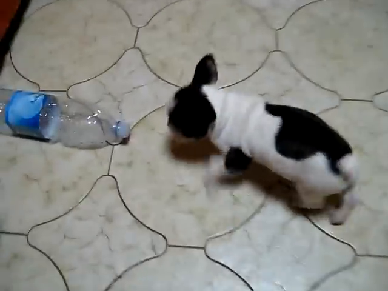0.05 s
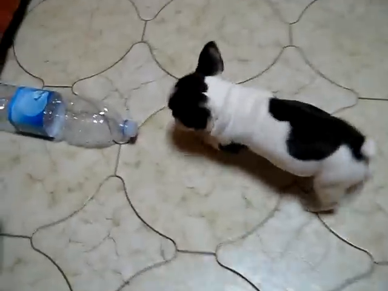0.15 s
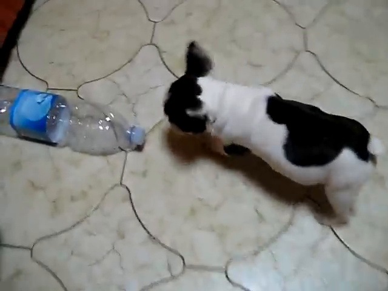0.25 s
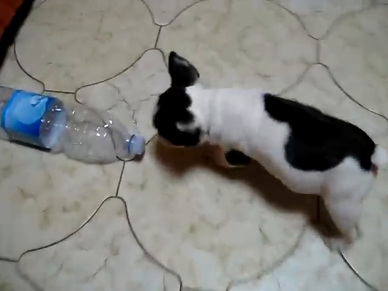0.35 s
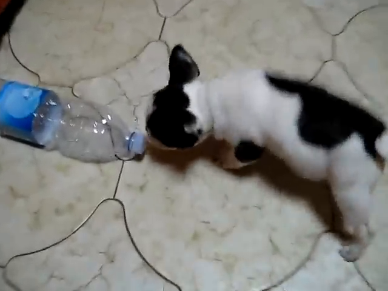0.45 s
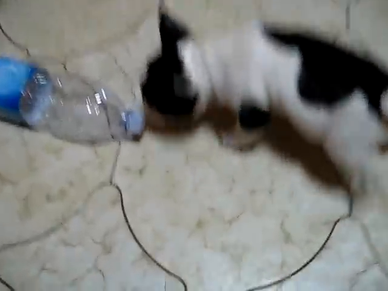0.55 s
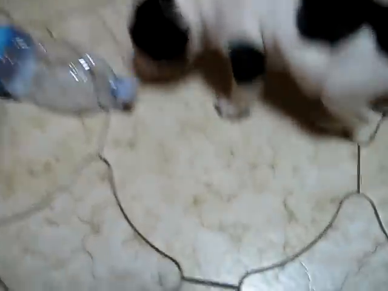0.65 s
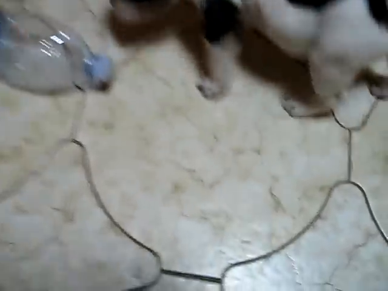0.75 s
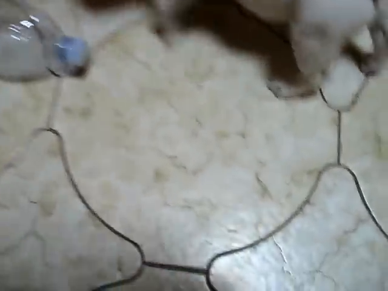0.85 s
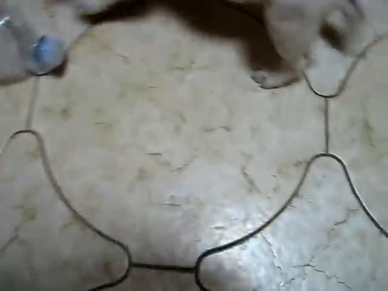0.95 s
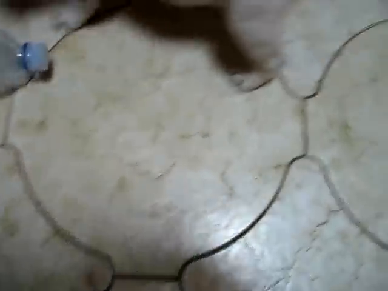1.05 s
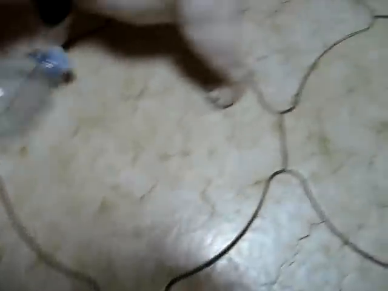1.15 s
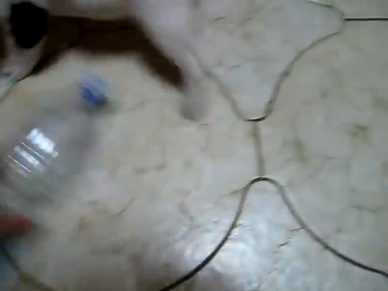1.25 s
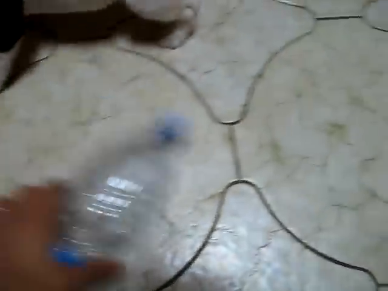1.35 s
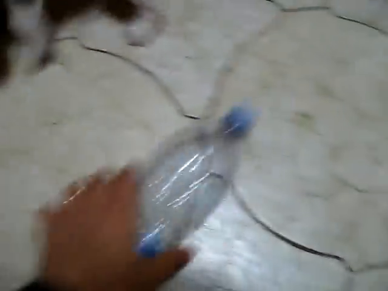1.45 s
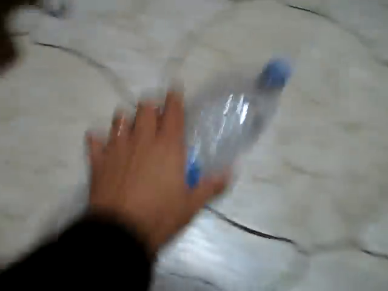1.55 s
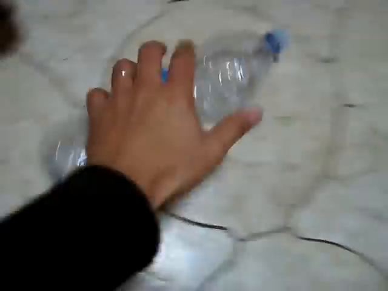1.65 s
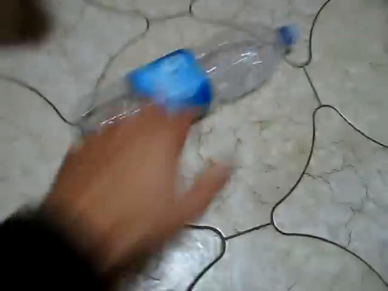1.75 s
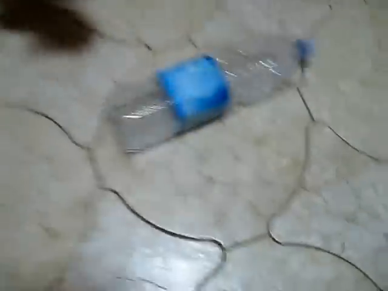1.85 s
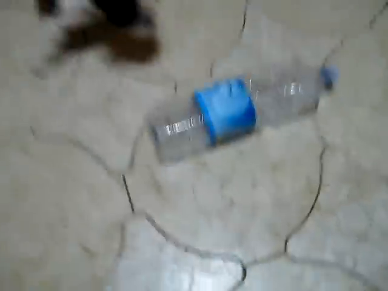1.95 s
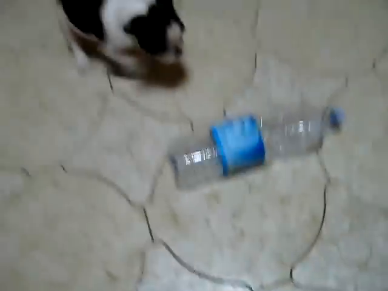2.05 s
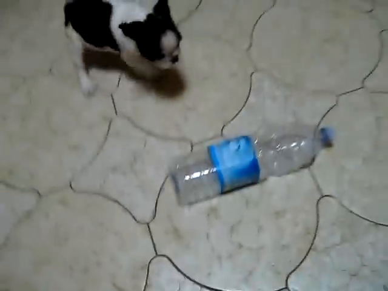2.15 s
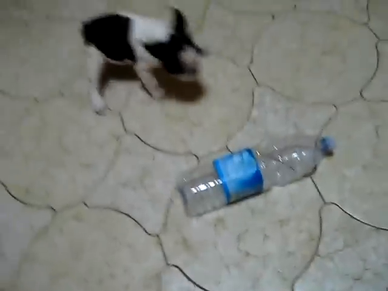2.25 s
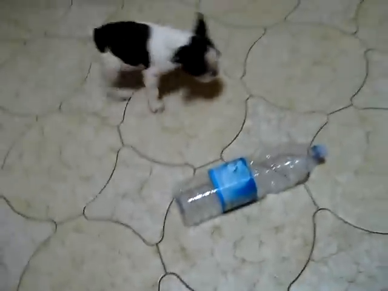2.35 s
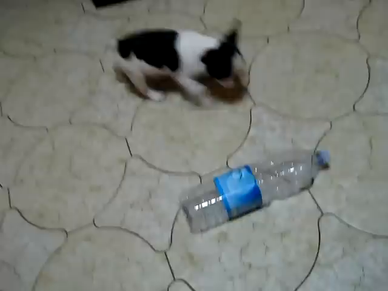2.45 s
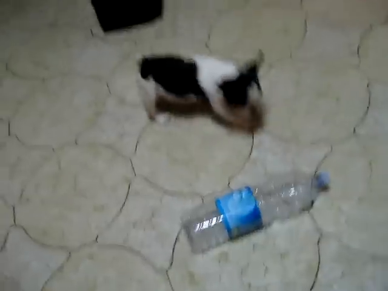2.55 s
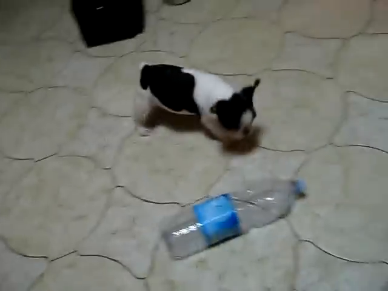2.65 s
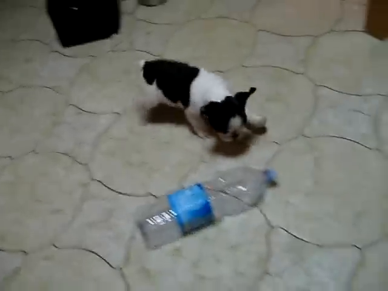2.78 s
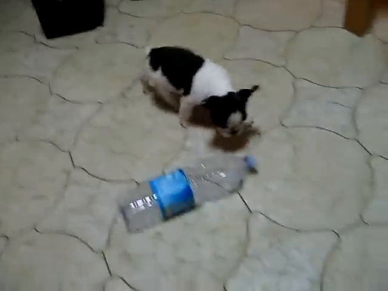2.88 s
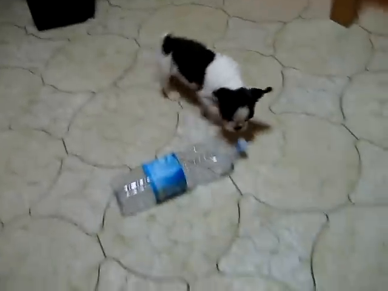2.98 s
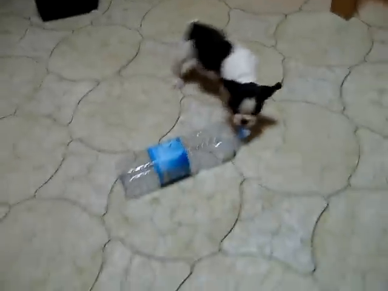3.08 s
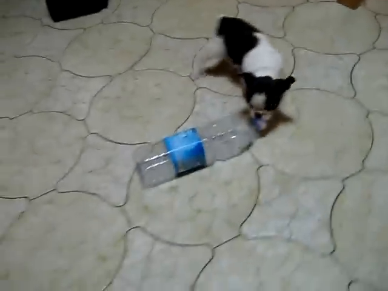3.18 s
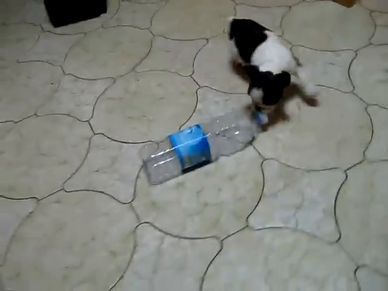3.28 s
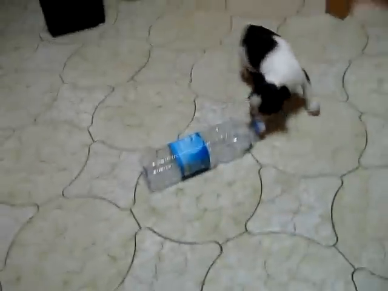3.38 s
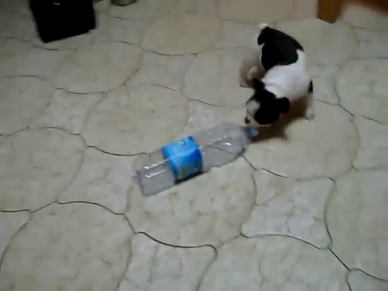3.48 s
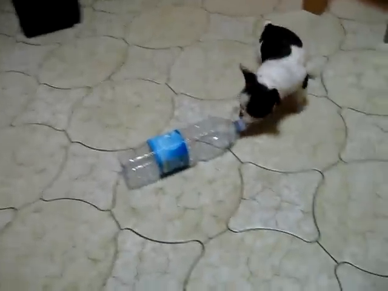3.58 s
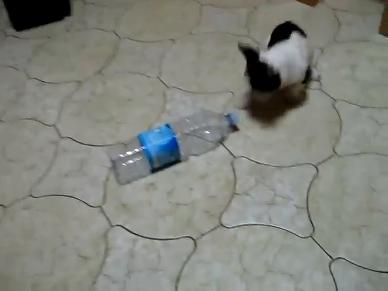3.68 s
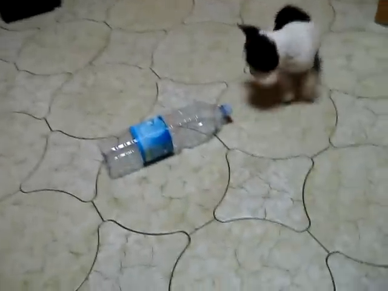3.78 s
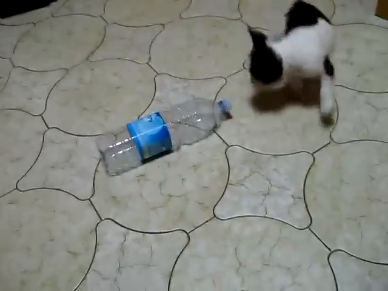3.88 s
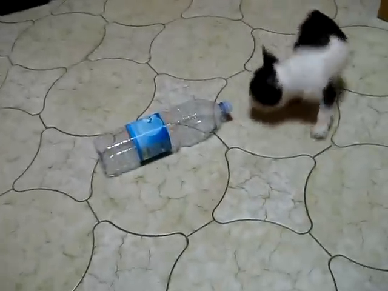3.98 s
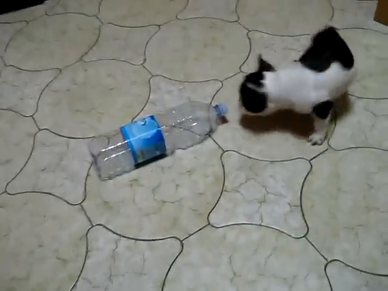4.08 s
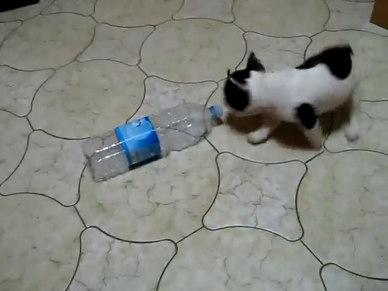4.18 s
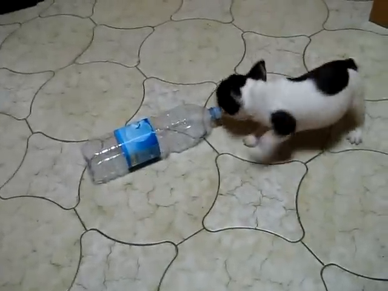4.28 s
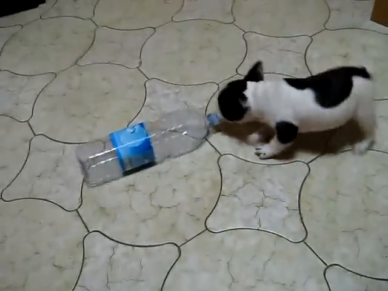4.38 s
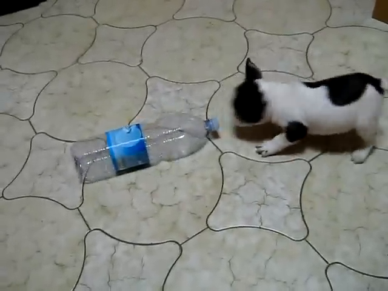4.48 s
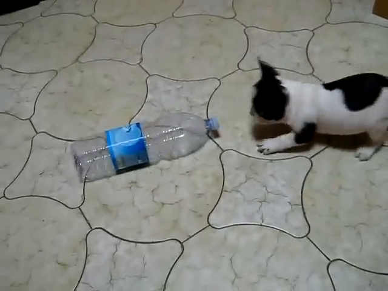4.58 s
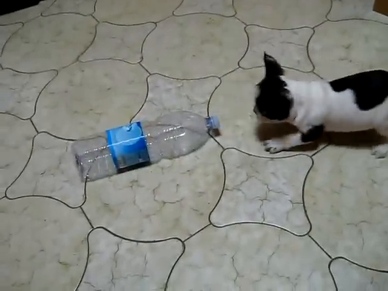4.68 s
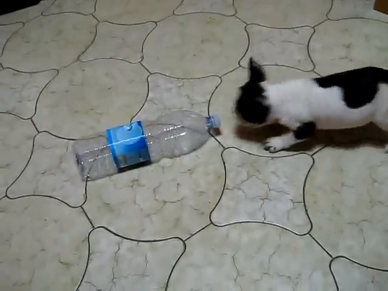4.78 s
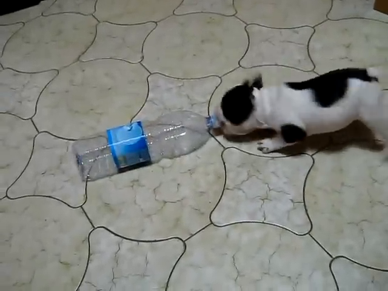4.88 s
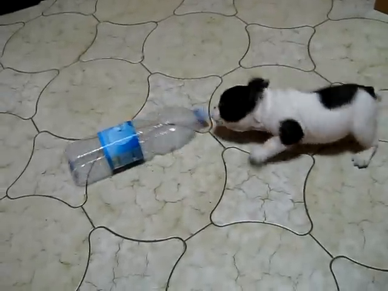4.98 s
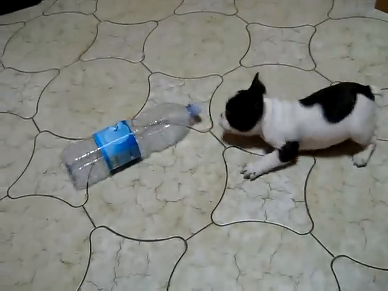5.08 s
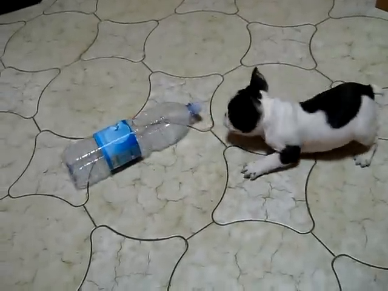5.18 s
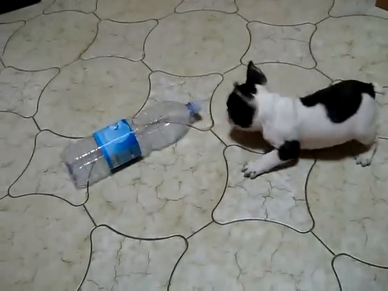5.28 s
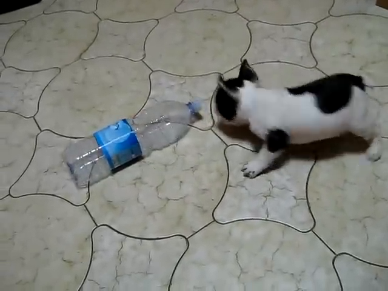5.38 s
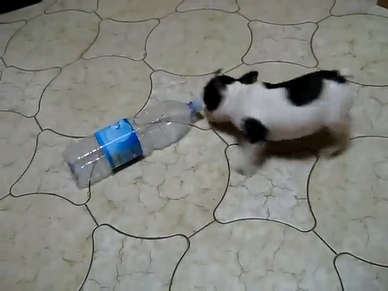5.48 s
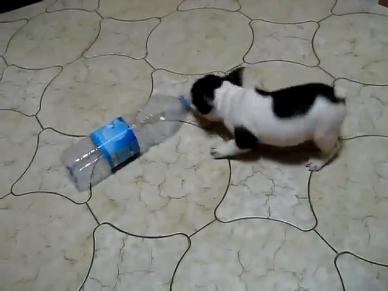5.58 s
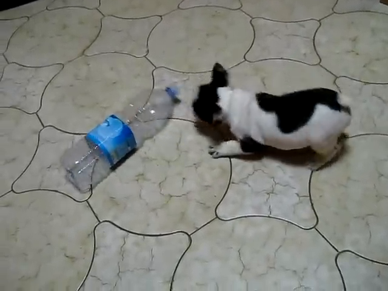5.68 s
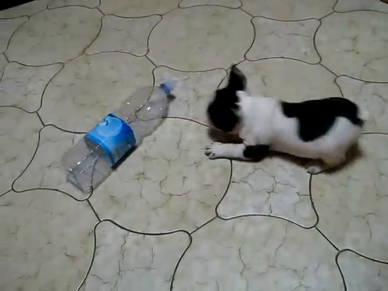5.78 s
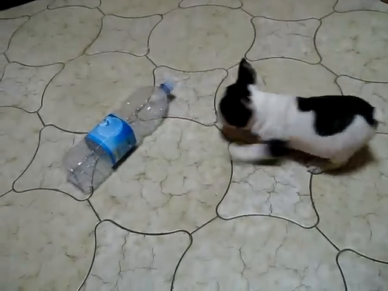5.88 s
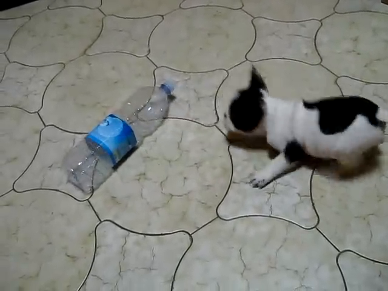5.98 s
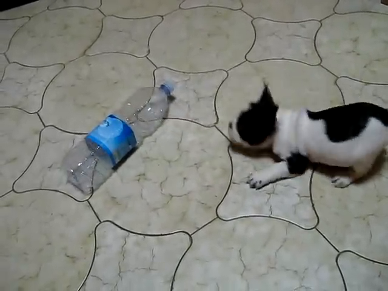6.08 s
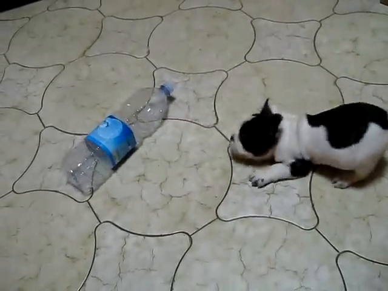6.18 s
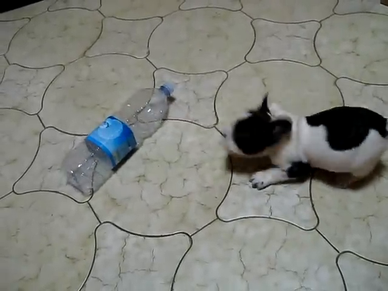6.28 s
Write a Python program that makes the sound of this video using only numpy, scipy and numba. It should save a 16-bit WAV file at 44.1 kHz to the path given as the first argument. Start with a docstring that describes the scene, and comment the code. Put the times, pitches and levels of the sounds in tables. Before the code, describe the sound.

Close, hissy handheld pickup indoors on tiles. A fading bark echo and quiet shuffling give way to a hand dragging a hollow plastic bottle, with dense scraping, creasing, soft bumps and sharp clicks. The bottle settles with a brief rattling knock. Light paws skid and patter, then a little puppy lets out spaced, rough-edged yaps that ring off hard walls, with a thin whimper before the last, cut-off one.

```python
"""The echo of an earlier yap dies away as coloured noise, over steady hiss and a lumpy rumble of camera handling.
Faint shuffling on a tiled floor follows; from about one second a hand slides an empty plastic bottle:
dense noise slips and creases, soft-blow thuds and snapping clicks. It rocks back with a chattering knock; pads scuff.
Then a puppy yaps four times, whimpering before the last: harmonics and rough noise through moving resonances.
A hard room of sparse taps rings on, and the camera's gain control presses the loud moments down."""
import sys
import numpy as np
from scipy import signal
from scipy.fft import rfft, irfft, next_fast_len
from scipy.io import wavfile
from scipy.ndimage import uniform_filter1d
from numba import njit

SR = 44100
rng = np.random.default_rng(int(sys.argv[2]) if len(sys.argv) > 2 else 0)


def generate_wav(sig):
    """Save sig (samples, or channels by samples) to the path in sys.argv[1] as 16-bit PCM at SR."""
    pcm = np.round(np.clip(np.atleast_2d(sig).T, -1, 1) * 32767).astype(np.int16)
    wavfile.write(sys.argv[1], SR, pcm)


N = 279153

# All source levels are ahead of the room and the gain control.
# Still room and microphone hiss, shape only: freq_hz, level_db (per Hz)
HUSH_SPECTRUM = [(15, -47), (25, -30), (259, -1.5), (651, -6), (726, -0.5), (787, -4.5), (1060, 2),
                 (1250, -3.5), (2150, -4.5), (5720, -14), (7920, -23.5), (12900, -20), (15200, -17),
                 (16500, -29)]
HUSH_LEVEL_DB = -49.5

# An earlier yap's echo dying away in the first moments, then faint shuffling and the bottle slid
# over the tiles: start_s, level_db, treble_db (against level_db)
RUBBING_LEVELS = [(0.0, -33.5, -16), (.07, -41.5, -12), (.18, -48, -7), (.7, -49.5, -2.5), (.91, -43.5, -1),
                  (0.934, -34.5, -5.5), (1.1, -26, -3), (1.2, -20.5, -5), (1.3, -25, -5), (1.35, -24.5, -6),
                  (1.44, -28, -5.5), (1.52, -21.5, -5), (1.63, -31, -2.5), (1.68, -24.5, -5),
                  (1.72, -30.5, -4.5), (1.81, -29, -6.5), (2.06, -41.5, -8), (2.2, -51.5, -7.5),
                  (2.5, -45.5, -9.5), (2.62, -52.5, -9), (3.4, -45, -11), (3.75, -60, -4), (4.25, -74, 6)]
# Tone of the rubbing body, shape only: freq_hz, level_db (per Hz)
RUBBING_SPECTRUM = [(290, -113), (500, -14.5), (852, -3), (976, -2.5), (1610, -0.5), (2110, -2.5),
                    (4260, -2.5), (6700, -10.5), (7500, -10), (9750, -130), (16500, -120)]
# Pads scuffing and skidding: start_s, length_s (up to the final fade), body_db, treble_db
SCUFFS = [(2.712, 0.052, -50, -49), (2.928, 0.13, -46, -56), (3.162, .09, -38.5, -45),
          (3.54, .05, -41.5, -52), (3.63, 0.079, -32.5, -42.5), (3.799, 0.028, -50, -54),
          (3.849, 0.021, -43, -59), (3.996, .1, -53.5, -68), (4.23, 0.031, -63, -49),
          (4.29, 0.23, -52, -40.5), (4.446, .08, -46, -42.5), (4.622, 0.2, -64, -59),
          (4.84, 0.086, -44, -54), (4.94, 0.087, -52, -58), (5.024, 0.11, -38, -44), (5.39, 0.13, -50, -58),
          (5.556, 0.18, -46, -38), (5.748, 0.063, -39, -46), (5.858, 0.28, -51, -56.5),
          (6.095, 0.13, -56, -73)]
SCUFF_RISE_S, SCUFF_SAG_DB, SCUFF_FADE_S = 0.0091, -9, 0.045
HOLLOW_DB, HOLLOW_SHARE = -35.5, 0.41  # the hollow grows more slowly than the body
RUMBLE_DB, RUMBLE_LUMPS_DB = -71.5, 5.0

# Paws landing, the hollow bottle bumping, and low bumps of the handled camera: start_s, peak_db, pitch_hz
THUDS = [(0.076, -21, 323), (0.878, -39, 450), (0.92, -39, 109), (2.041, -52, 100), (1.202, -24.5, 480),
         (1.25, -27, 346), (1.329, -28, 340), (1.517, -26.5, 507), (1.679, -38, 495), (1.976, -41.5, 526),
         (2.078, -36.5, 494), (2.242, -39.5, 306), (2.376, -36, 350), (2.46, -38, 393), (2.801, -31.5, 318),
         (2.822, -34.5, 310), (3.02, -34.5, 340), (3.039, -34.5, 370), (3.166, -35.5, 280),
         (3.384, -39.5, 362), (3.55, -45, 495), (3.634, -35.5, 262), (5.54, -30.5, 470), (6.272, -29, 500),
         (6.307, -28, 242)]
THUD_T60_S, THUD_T60_S_PER_DB = .3, .004  # a harder blow lasts longer

# Claw ticks and clicks of the bottle's wall: start_s, peak_db, centre_hz, treble_peak_db
CLICKS = [(0.307, -25.5, 4120, -50), (0.881, -30, 3700, -37), (1.062, -18, 2340, -31),
          (1.111, -14, 1670, -30), (1.197, -8.5, 1600, -23), (1.234, -9.5, 2230, -27),
          (1.337, -10, 1160, -29), (1.462, -12, 4130, -29), (1.496, -6, 4200, -7), (1.55, -7.5, 3940, -11),
          (1.589, -6, 2540, -7.5), (1.624, -6.5, 4300, -7), (1.679, -15.5, 2220, -12),
          (1.791, -12.5, 3020, -18), (1.973, -26, 1450, -30), (2.061, -33.5, 2070, -15.5),
          (2.085, -21.5, 970, -49), (2.257, -32, 3330, -54), (2.399, -14, 2970, -43),
          (2.963, -27, 3530, -48), (3.212, -28, 4000, -49), (3.525, -32, 1020, -50),
          (3.635, -19, 3420, -19), (3.678, -25, 3300, -35), (3.705, -29.5, 1030, -43),
          (3.801, -30, 4170, -28), (3.844, -26.5, 3960, -52), (3.851, -36, 4700, -37),
          (3.864, -43, 3560, -22.5), (4.033, -33, 2010, -59), (4.089, -33, 5600, -46),
          (4.141, -51, 1040, -28), (4.843, -23.5, 2080, -54), (4.877, -33, 2320, -38),
          (5.398, -29, 3530, -26.5), (6.106, -45, 3750, -60), (6.276, -17.5, 1270, -29)]
CLICK_T60_S, SNAP_HEIGHT, RATTLE_HEIGHT = .032, 2.8, .3

# The bottle rocks back on the tiles: start_s, level_db, t60_s
KNOCK = (2.371, -19, 0.2)
# Modes of the bottle's wall: freq_hz, width_hz (each of two passes), level_db (ahead of width scaling)
WALL_MODES = [(1500, 2700, -14), (2320, 470, 0.5), (3100, 380, 2.5), (4000, 490, 2.5), (4360, 800, 1.5),
              (4870, 380, 0), (5700, 540, -2.5), (11500, 15000, -15.5)]

# One table a yap or whimper: start_s, effort_db, pitch_hz, roughness (clipped to 0-1),
# mouth_hz, throat_hz, throat_db (against the mouth)
YAPS = [
    [(4.272, -41, 673.7, 0.26, 760, 2780, 4), (4.288, -20, 796, 0.27, 790, 2750, -1),
     (4.295, -9, 988, 0.77, 1820, 3400, -17), (4.303, -14.5, 978, 0.68, 1950, 3270, -1),
     (4.306, -14, 595, 0.83, 1740, 2470, 3), (4.318, -8, 611.3, 0.1, 1280, 2450, -12),
     (4.337, -9, 655, 0.4, 1250, 4000, -5), (4.342, -14.5, 952, .6, 1330, 3850, -2),
     (4.366, -7, 981, 0.37, 1340, 3100, 14), (4.385, -10, 970, 0.92, 1190, 3420, -8),
     (4.41, -14.5, 940, 0.98, 1210, 3500, -7)],
    [(4.918, -15, 637.3, 0.4, 1710, 4760, -5), (4.932, -10, 608.8, 0.75, 1510, 3180, -0.5),
     (4.962, -13, 599.2, 0.51, 1180, 3670, -3), (4.966, -9, 934, 0.45, 980, 3380, 8),
     (4.985, -12.5, 937.4, 0.83, 990, 3400, -6), (4.995, -17, 905, 0.62, 1100, 2690, 13),
     (5.025, -18.5, 960, 0.9, 1220, 2900, -1), (5.04, -27, 1039, 0.28, 1260, 3100, 16),
     (5.07, -35.5, 1039, 0.07, 1280, 3200, 18), (5.078, -30.5, 922, 0.35, 1010, 2760, 17),
     (5.13, -60, 890, 1.2, 995, 2740, 0)],
    [(5.54, -16.5, 469.6, 0.52, 1960, 4000, -16), (5.552, -11, 495.6, 0.56, 1690, 2590, -7.5),
     (5.585, -7, 628.8, 0.3, 1190, 3820, -12), (5.6, -27, 684.6, 0.65, 1410, 3200, -14),
     (5.62, -3, 740, 0.71, 1570, 3900, -10), (5.634, -8, 658.6, 0.54, 1360, 4000, -13),
     (5.68, -17, 606, 1.07, 1260, 3100, -8.5)],
    [(6.142, -54, 1500, 0.84, 1540, 2800, -12), (6.175, -49, 1630, 0.94, 1620, 2780, -12),
     (6.215, -52, 1650, 0.8, 1630, 2800, -10), (6.235, -66, 1600, 0.4, 1600, 2800, -10)],
    [(6.293, -23, 707, 0.56, 1240, 3050, -8), (6.306, -25.5, 731, 0.84, 990, 3480, -1),
     (6.335, -19, 702, 0.63, 950, 2160, 2)],
]
# Resonance widths, each of two passes: mouth_width_hz, throat_width_hz
VOICE_WIDTHS = (620, 980)
# Fixed cavities of the nose: freq_hz, width_hz (each of two passes), level_db (against the mouth)
NOSE = [(2200, 1400, -14), (3950, 600, -10), (5100, 1200, -17), (12000, 9000, -36)]
# Hard things in the room that ring along with the puppy: freq_hz, width_hz, level_db
RINGS = [(2938, 5, 9), (3118, 5, 8)]

# How long each band of the room rings: freq_hz, t60_s
ROOM_DECAY = [(250, 0.19), (1000, 0.38), (3000, 0.36), (6000, 0.33), (12000, 0.044)]
# Narrow null in the recorder's response: freq_hz, half_width_hz, depth_db
RECORDER_NULL = (7920, 260, -30)
EDGE_HZ = 15780  # top of the recorder's band


def gain_of(db):
    """Turns decibels into a factor."""
    return 10 ** (np.asarray(db) / 20)


def evened(x):
    """Scales to rms 1."""
    return x / np.sqrt(np.mean(x ** 2) + 1e-20)


def read(points, hz):
    """Reads a table along a log-frequency axis."""
    f, value = np.transpose(points)
    return np.interp(np.log(hz + 1), np.log(f + 1), value)


def add(mix, start_s, sound):
    """Mixes a sound in at a time, cut at the end of the mix."""
    part = mix[max(round(start_s * SR), 0):][:len(sound)]
    part += sound[:len(part)]


def coloured(x, db_of_hz):
    """Filters by a gain over frequency."""
    size = next_fast_len(len(x))
    gain = gain_of(db_of_hz(np.fft.rfftfreq(size, 1 / SR)))
    return irfft(rfft(x, size) * gain, size)[:len(x)]


def band(x, lo_hz, hi_hz):
    """Band-passes and scales to rms 1."""
    sos = signal.butter(3, [lo_hz, hi_hz], "band", fs=SR, output="sos")
    return evened(signal.sosfilt(sos, x))


def resonate(x, hz, width_hz):
    """Shifts hz (fixed or moving) down to zero, smooths, and shifts back: a resonance of gain 1."""
    turn = np.exp(2j * np.pi * np.cumsum(hz * np.ones(len(x))) / SR)
    r = np.exp(-np.pi * width_hz / SR)
    return 2 * (turn * signal.lfilter([1 - r], [1, -r], x / turn + 1e-18)).real


def resonate_twice(x, hz, width_hz):
    """Two equal passes give a resonance with steeper skirts."""
    return resonate(resonate(x, hz, width_hz), hz, width_hz)


def slow_noise(smooth_samples):
    """Noise smoothed twice wanders slowly at rms 1."""
    once = uniform_filter1d(rng.standard_normal(N), size=smooth_samples)
    return evened(uniform_filter1d(once, size=smooth_samples))


def hush():
    """The still room and the microphone's own hiss, as steady coloured noise."""
    noise = coloured(rng.standard_normal(N), lambda hz: read(HUSH_SPECTRUM, hz))
    return gain_of(HUSH_LEVEL_DB) * evened(noise)


def creases():
    """Dents in the plastic give way, each a short ring at one of 18 pitches."""
    out, t = np.zeros(N), np.arange(700) / SR
    for hz in np.geomspace(1000, 5500, num=18):
        happens = rng.random(N) < 40 / SR  # about 40 a second at each pitch
        size = gain_of(4.3 * np.minimum(rng.exponential(1, N), 4)) * happens
        ring = np.sqrt(hz) * np.sin(2 * np.pi * hz * t)
        ring *= np.exp(-t * hz / 5) * (1 - np.exp(-t / .0005))
        out += signal.oaconvolve(size, ring)[:N]
    return evened(out)


def rubbing():
    """Dense uneven slips sound in body, treble and hollow; a lumpy low rumble of camera handling lies beneath.

    The same noise stands in for the earlier yap's echo in the first moments."""
    t = np.arange(N) / SR
    clumps, lumps = slow_noise(700), slow_noise(3000)
    size = gain_of(0.52 * np.minimum(rng.exponential(1, N), 5) + 1.23 * clumps)
    happens = rng.random(N) < 9000 / SR  # about 9000 slips a second
    slips = size * rng.standard_normal(N) * happens

    grain = evened(coloured(slips, lambda hz: read(RUBBING_SPECTRUM, hz)))
    body = evened(grain + 0.63 * creases())
    treble = band(slips, 8780, 14950)
    hollow = band(slips, 195, 936)
    rumble = band(slips, 36, 126)

    start_s, level_db, treble_db = np.transpose(RUBBING_LEVELS)
    body_power = gain_of(np.interp(t, start_s, level_db)) ** 2
    treble_power = gain_of(np.interp(t, start_s, level_db + treble_db)) ** 2

    # scuffing pads swell the same body and treble
    for start_s, length_s, scuff_db, hiss_db in SCUFFS:
        times = [0, SCUFF_RISE_S, length_s, length_s + SCUFF_FADE_S]
        shape = np.interp(t - start_s, times, [0, 1, gain_of(SCUFF_SAG_DB), 0])
        body_power = body_power + (gain_of(scuff_db) * shape) ** 2
        treble_power = treble_power + (gain_of(hiss_db) * shape) ** 2

    low = gain_of(HOLLOW_DB) * body_power ** (HOLLOW_SHARE / 2) * hollow
    low = low + gain_of(RUMBLE_DB + RUMBLE_LUMPS_DB * lumps) * rumble  # apart from the rubbing's level
    return np.sqrt(body_power) * body + np.sqrt(treble_power) * treble + low


def thuds():
    """A soft blow, a spike with decaying noise behind it, sets off a low, short, double ring."""
    out, t = np.zeros(N), np.arange(8000) / SR
    for start_s, peak_db, pitch_hz in THUDS:
        t60_s = max(THUD_T60_S + THUD_T60_S_PER_DB * peak_db, .02)
        blow = (rng.standard_normal(len(t)) + 16.0 * (t == 0)) * gain_of(-60 * t / t60_s)
        ring = 0
        for ratio, gain in ((1, 1), (1.7, 0.35)):
            hz = ratio * pitch_hz
            ring = ring + gain * resonate(resonate(blow, hz, 103.0), hz, 320.0)
        add(out, start_s, gain_of(peak_db) * ring / abs(ring).max())
    return out


def clicks():
    """A sharp snap with a rattle of noise behind it sounds in a broad resonance and in the treble."""
    out, t = np.zeros(N), np.arange(2500) / SR
    for start_s, peak_db, centre_hz, treble_peak_db in CLICKS:
        rattle = RATTLE_HEIGHT * rng.standard_normal(len(t))
        burst = (rattle + (t == 0) * SNAP_HEIGHT) * gain_of(-60 * t / CLICK_T60_S)
        low = band(resonate(burst, centre_hz, 0.29 * centre_hz), 390, 6300)
        high = band(burst, 9600, 17300)
        click = gain_of(peak_db) * low / abs(low).max()
        add(out, start_s, click + gain_of(treble_peak_db) * high / abs(high).max())
    return out


def knock():
    """The wall chatters against the tile and rings in its modes."""
    start_s, level_db, t60_s = KNOCK
    t, out = np.arange(12000) / SR, np.zeros(N)
    taps = t * 900 % 1 < .15  # 900 short bursts a second, soon fading
    chatter = rng.standard_normal(len(t)) * (1 + 1.04 * np.exp(-t / 0.012) * taps)
    ring = 0
    for hz, width_hz, mode_db in WALL_MODES:
        ring = ring + gain_of(mode_db) * resonate_twice(chatter, hz, width_hz) / np.sqrt(width_hz)
    add(out, start_s, gain_of(level_db - 60 * t / t60_s) * evened(ring))
    return out


def yap(rows):
    """Uneven voice pulses and puffs of noise pass the moving mouth and throat and the nose's cavities."""
    start_s, *columns = np.transpose(rows)
    t = np.arange(start_s[0], start_s[-1], 1 / SR)
    tracks = (np.interp(t, start_s, column) for column in columns)
    effort_db, pitch_hz, rough, mouth_hz, throat_hz, throat_db = tracks
    rough = np.clip(rough, 0, 1)
    wobble = evened(uniform_filter1d(rng.standard_normal(len(t)), size=120))
    flutter = evened(uniform_filter1d(rng.standard_normal(len(t)), size=120))

    turns = np.cumsum(pitch_hz * (1 + .045 * rough * wobble)) / SR
    tilt = np.clip((5.0 - effort_db) / 21.7, 0, 2)  # a soft voice has weak overtones
    folds = sum(np.cos(2 * np.pi * k * turns) / k ** tilt for k in range(1, 13))
    puffs = (1.1 + np.exp(-(turns % 1) / 1.1)) * rng.standard_normal(len(t))
    drive = (1 - rough) * evened(folds) + .7 * rough * evened(puffs)

    mouth_width_hz, throat_width_hz = VOICE_WIDTHS
    cavities = [(mouth_hz, mouth_width_hz, 0), (throat_hz, throat_width_hz, throat_db)] + NOSE
    voice = 0
    for k, (hz, width_hz, level_db) in enumerate(cavities):
        polarity = (-1) ** k  # neighbours alternate in sign
        voice = voice + polarity * gain_of(level_db) * resonate_twice(drive, hz, width_hz)
    voice = band(voice, 750, 14000)  # a small head radiates little bass

    # level the voice out so that effort alone, with its rough flutter, sets the loudness
    loudness = np.sqrt(uniform_filter1d(voice ** 2, size=400) + 1e-9)
    onset = np.minimum(1, (t - start_s[0]) / 0.00046)
    return start_s[0], gain_of(effort_db + 2.0 * rough * flutter) * voice / loudness * onset


def room(x):
    """Sparse taps of random sign, one in every 12 samples, with each band dying at its own speed."""
    taps = np.zeros(SR)
    at = np.arange(300, SR - 12, 12)
    taps[at + rng.integers(0, 12, len(at))] = rng.choice([-1., 1.], len(at))
    hz, t, z = signal.stft(taps, SR, nperseg=256)
    decay = gain_of(-60 * t / read(ROOM_DECAY, hz)[:, None])
    tail = signal.istft(z * decay, SR, nperseg=256)[1]
    return signal.fftconvolve(x, tail / np.linalg.norm(tail))[:N]


def scene():
    """All sources are heard by one microphone; puppy, thuds, clicks and knock also feed the room."""
    background = hush() + rubbing()
    small = thuds() + clicks()
    rocking = knock()
    puppy = np.zeros(N)
    for rows in YAPS:
        add(puppy, *yap(rows))
    rings = sum(gain_of(db) * resonate(puppy, hz, width_hz) for hz, width_hz, db in RINGS)
    wet = room(gain_of(-5.0) * puppy + gain_of(-7.0) * small + gain_of(-28.0) * rocking)
    return (background + small + rocking + puppy + rings + wet)[None]


@njit
def follow(over_db, press, release):
    """Moves towards the excess level by one share a sample when it grows, another when it shrinks."""
    out, now = np.empty_like(over_db), 0.
    for i in range(len(over_db)):
        now += (over_db[i] - now) * (press if over_db[i] > now else release)
        out[i] = now
    return out


def record(dry):
    """Gain control holds loud sound near a ceiling and peaks round off; then the null and the band limit."""
    power = signal.lfilter([.004], [1, -.996], dry[0] ** 2)
    over_db = np.maximum(10 * np.log10(power + 1e-12) + 24, 0)  # excess above -24 dB
    # presses down over 38 ms, lets go over 3.9 ms
    cut_db = 0.98 * follow(over_db, 1 / (0.038 * SR), 1 / (0.0039 * SR))
    x = 0.91 * np.tanh(dry[0] / gain_of(cut_db) / 0.89)
    null_hz, half_width_hz, depth_db = RECORDER_NULL
    x = coloured(x, lambda hz: depth_db / (1 + ((hz - null_hz) / half_width_hz) ** 4))
    lowpass = signal.firwin(1501, EDGE_HZ, window=("kaiser", 5), fs=SR)
    return signal.oaconvolve(x, lowpass, "same")[None]


dry = scene()
out = record(dry)
generate_wav(out)
```